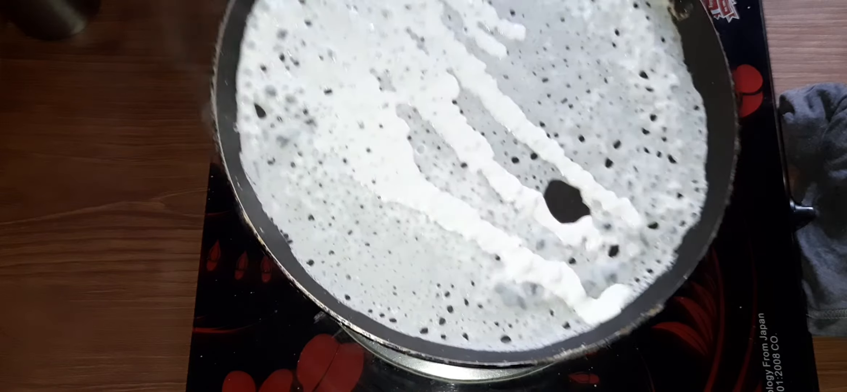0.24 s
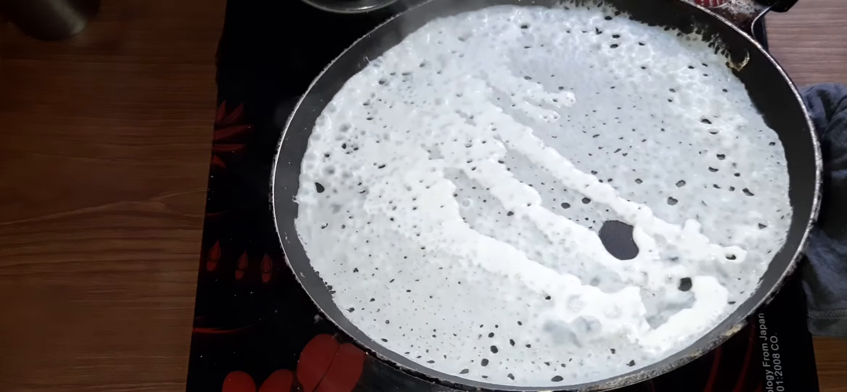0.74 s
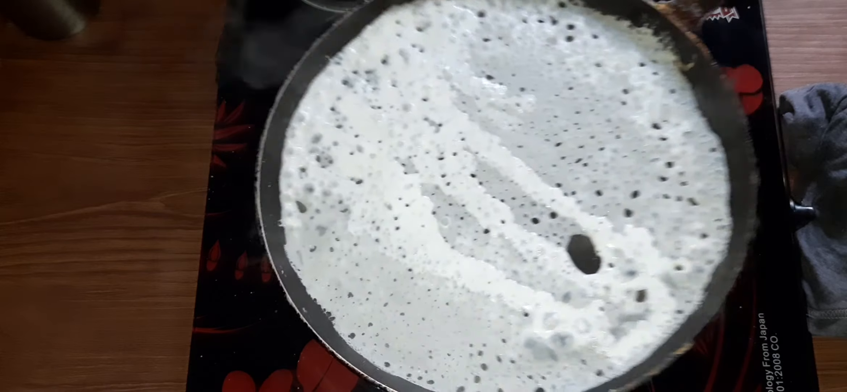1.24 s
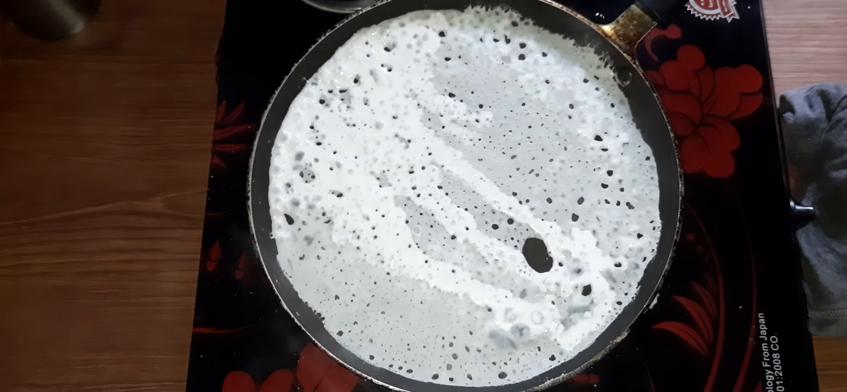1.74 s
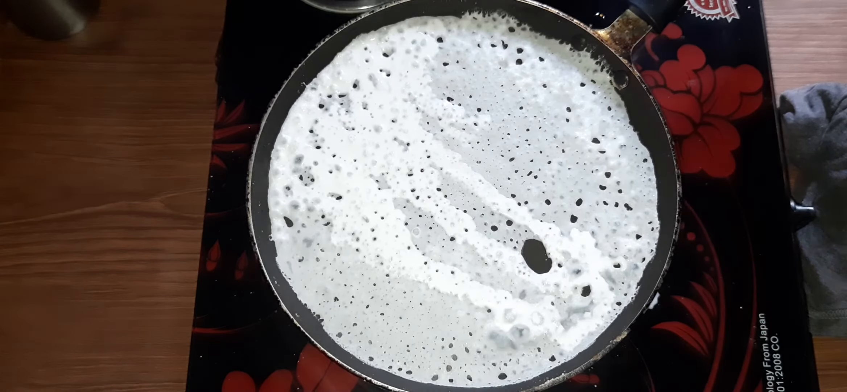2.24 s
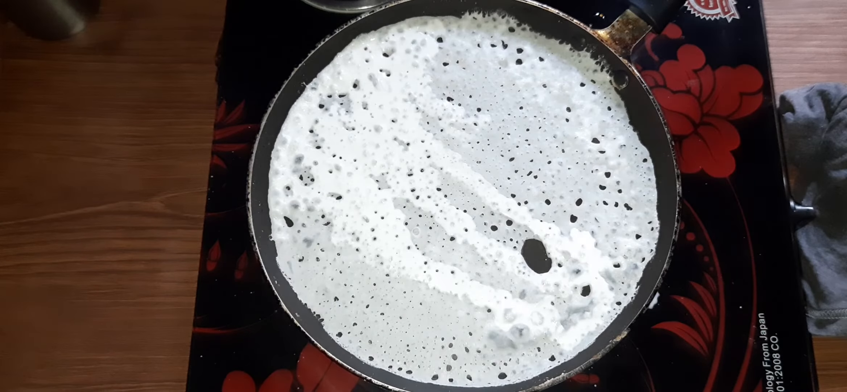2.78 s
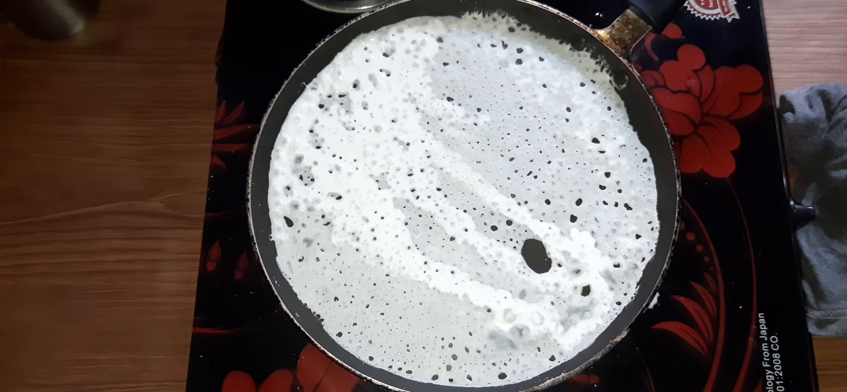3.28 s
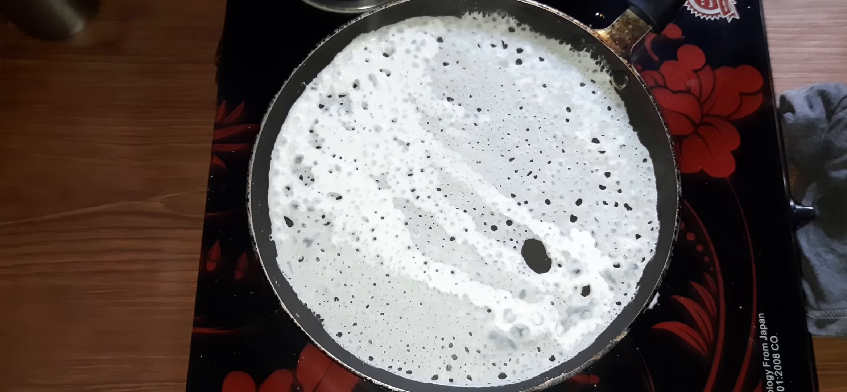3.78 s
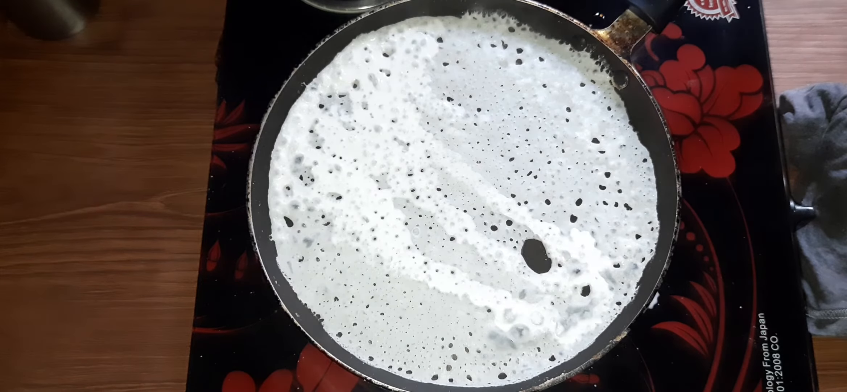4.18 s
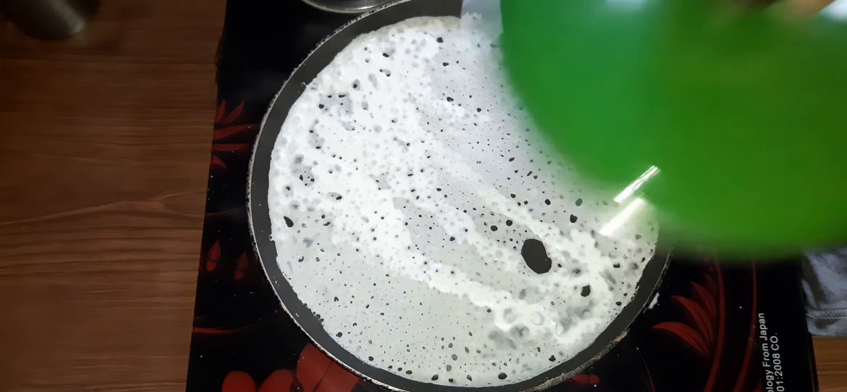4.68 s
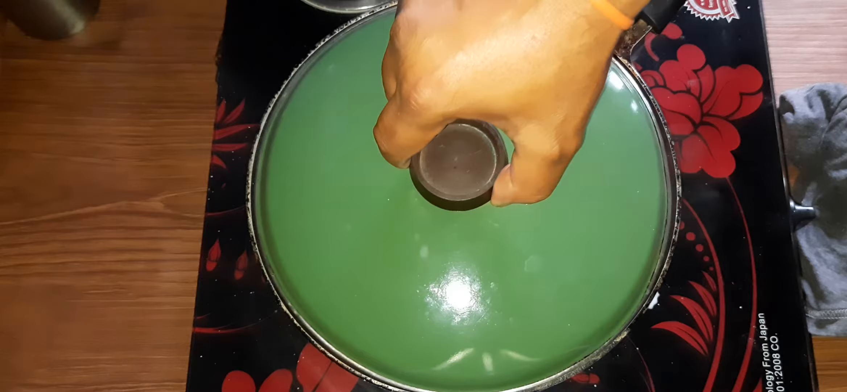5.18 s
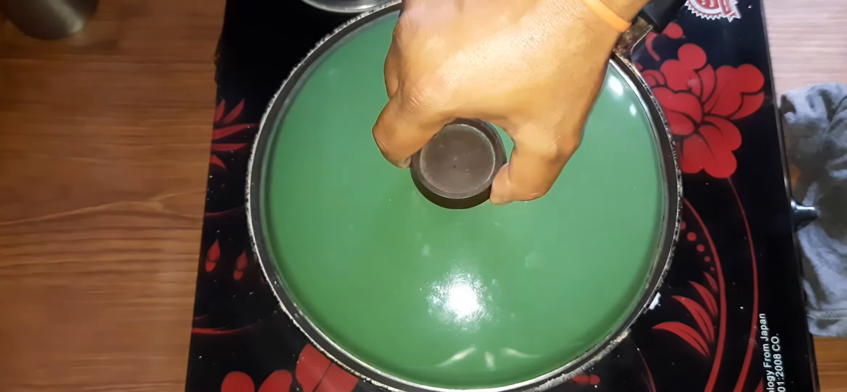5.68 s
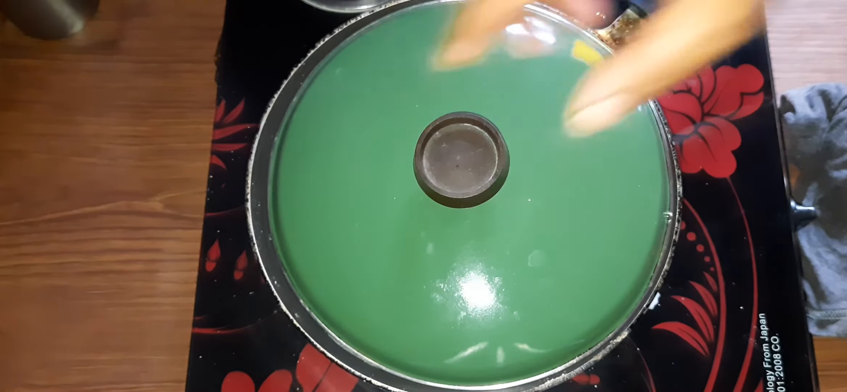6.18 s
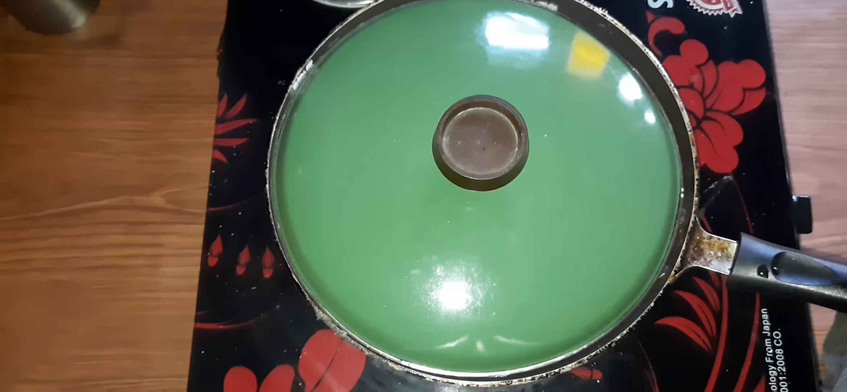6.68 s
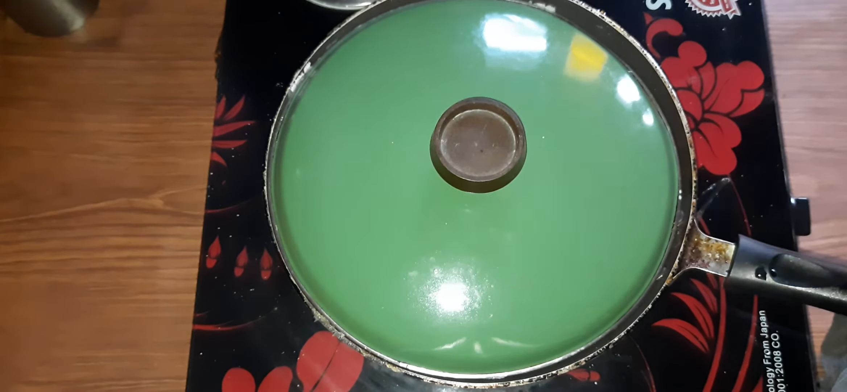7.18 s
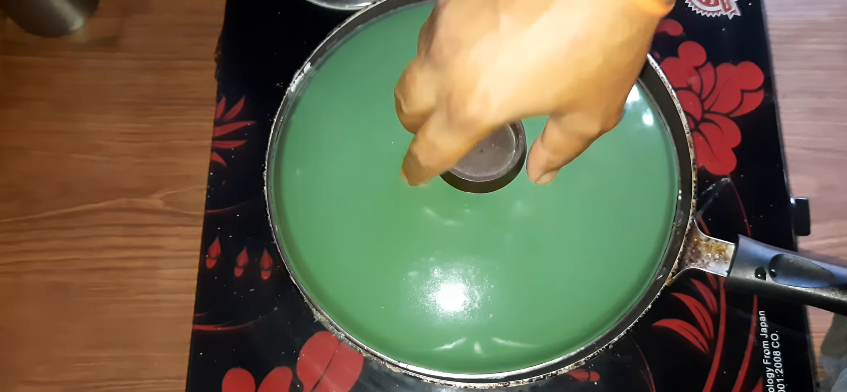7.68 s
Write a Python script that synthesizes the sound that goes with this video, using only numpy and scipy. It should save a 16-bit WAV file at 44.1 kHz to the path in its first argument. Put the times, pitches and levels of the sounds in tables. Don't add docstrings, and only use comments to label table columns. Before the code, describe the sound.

In a small, slightly live kitchen, close stereo pickup opens on loud, wet sizzling batter, with dense crackle, sharp spits and a low fluttering flame. From about 0.7 s small bubbles pop with rising blips as the frying subsides. At 1.55-1.75 s the pan is set down in a cluster of dull metallic clunks with a low boom; knocks and a bright grate ring follow around 1.9-2.15 s. Sparse spits and pops continue over thin fizz. A soft door thud booms at 3.45 s. Around 4.55 s something brushes lightly; the sizzle dulls as a lid lowers, with a faint airy steam whistle from 5.1 s and tiny low touches near 5.4 s. At 5.9 s a round hollow thump leads into bright, fierce fat crackling with strong spits. At 6.75 s it drops to a quiet, muffled simmer, faint rustles, occasional snaps and low steam drumming, swelling near 7.6 s until the end.

```python
import sys
import numpy as np
from scipy import signal
from scipy.fft import rfft
from scipy.io import wavfile
from scipy.ndimage import uniform_filter1d

SR = 44100
rng = np.random.default_rng(int(sys.argv[2]) if len(sys.argv) > 2 else 0)


def transcribe(signal):
    frames = np.atleast_2d(signal).T
    limited = np.clip(frames, -1, 1)
    pcm = np.round(limited * 32767).astype(np.int16)
    wavfile.write(sys.argv[1], SR, pcm)


def gain_from_db(level_db):
    decades = np.asarray(level_db, float) / 20
    return 10 ** decades


N = 349713

FAT_S, LID_ON_S = 5.885, 6.758
LID_LOWERED_S = (4.73, 5.22)
FADE_S, FADE_FROM_DB = 0.065, -22
SEATED_S, UPPER_DB = 1.5, (-3.5, 4)
STILL_DB, STILL_LID_DB = -73.5, -11
SPIT_WET_DB = 5.5
VENT_HZ, VENT_WIDTH = 5900, 940
DRUM_HZ, DRUM_WIDTH = 227.8, 42
EDGE_HZ = 15950

# t/s, level/dB, wetness of the batter (0-1)
FRY = [(0.0, -43.5, 0.95), (0.404, -42.5, 1.02), (1.068, -46.5, 1.0), (1.328, -50.5, 1), (1.535, -54.5, 1),
       (2.4, -59.5, 0.97), (3.0, -58.5, 0.6), (3.134, -62, 0.53), (3.43, -58, 0.17), (3.95, -59.5, 0.27),
       (4.35, -57, 0.2), (4.54, -60, 0.02), (5.069, -58, 0.05), (5.88, -63.5, 0.12), (6.104, -58, 0.08),
       (6.576, -59, 0.12), (6.992, -60.5, 0.13), (7.93, -61, 0.01)]
# low f/Hz, high f/Hz
FRY_BANDS = [
    (9000, 15500),
    (3500, 7000),
    (1000, 2500),
    (180, 700),
]
# f/Hz, density/dB
OPEN_PAN = [(88, -43.5), (150, -14), (201, -23.5), (407, -17.5), (652, -11.5), (1000, -10), (1570, -5.5),
            (2800, -3), (7550, -1.5), (9730, -7.5), (11800, -4), (15300, -3.5), (16200, -13.5)]
# f/Hz, density/dB
HOT_FAT = [(88, -52), (150, -5), (392, -17), (467, -15), (892, -8.5), (1270, -17), (5740, 11.5),
           (10100, -6), (12600, -7), (15300, -6), (16200, -18)]
# f/Hz, width/Hz, level/dB
UNDER_LID = [
    (216, 180, 20),
    (1266, 225, 19),
    (1734, 610, 8.5),
]
# f/Hz, likeness
LIKENESS = [(60, 0.94), (180, 0.081), (550, 0.4), (1650, 0.44), (4970, -0.45), (15000, -0.05)]
# f/Hz, L-R/dB
LEAN = [(60, 1.5), (180, -5.5), (550, -2), (1650, -1), (4970, -2), (15000, 4.5)]
# fizz/dB, hiss/dB, bubbling/dB, simmer/dB
STAGES = [
    (-0.83, -6, -22, -24.5),
    (19.5, 8.5, 1.5, -13.5),
    (-3, -11, -6, -10),
]
# fizz/dB, hiss/dB, bubbling/dB, simmer/dB
WET_DB = (0.1, 2.7, 18.85, 1.5)
# fizz/dB, hiss/dB, bubbling/dB, simmer/dB
LID_DB = (-6.5, -14, -5, 8.5)

# t/s, level/dB
BURNER = [(0.0, -55), (0.126, -67.5), (0.49, -53.5), (1.46, -58), (1.6, -66.5), (2.354, -89.5),
          (3.4, -80.5), (3.8, -65), (4.43, -81.5), (5.5, -69), (5.72, -81), (6.1, -71), (6.4, -74),
          (6.6, -99), (7.93, -83)]
# f/Hz, width/Hz, share of fuzz
FLAME = [
    (69, 4, .3),
    (118, 5, .4),
]
# f/Hz, density/dB
STILL_AIR = [(12, -45.5), (20, -9), (46, -5), (123, -0.5), (179, -8), (285, -10.5), (400, -17), (520, -49),
             (880, -120)]

# t/s, peak level/dB, body level/dB
SPITS = [(0.0373, -37, -11), (0.095, -25, -4), (0.3033, -21, -9), (0.3707, -26, -2), (0.3974, -26, 2),
         (0.491, -34, -4), (0.5004, -41, -4), (0.7679, -24.5, -4), (0.8499, -25, -4), (0.8584, -24, -4),
         (0.9157, -24, 1), (0.941, -24.5, -4), (1.0035, -27, 6), (1.012, -24.5, 1), (1.1716, -16.5, -2.5),
         (1.1996, -24.5, -8), (1.235, -23, -2), (1.2525, -25, -4), (1.3142, -25, 3), (1.3308, -36, -10),
         (1.3522, -37, -9), (1.369, -30, -8), (1.4335, -31.5, -4), (1.453, -42, -4), (1.4677, -29, -2),
         (1.523, -26, 6), (1.5961, -23, -2.5), (1.7493, -32, -4), (1.8115, -34, -4), (1.832, -38, -5.5),
         (1.844, -37, -6), (1.8773, -34, -4), (2.111, -32, -3), (2.1301, -39, -3.5), (2.3006, -38, -2),
         (2.3404, -32, -6), (2.358, -30, -6), (2.542, -41, -3.5), (2.5556, -24.5, -2.5), (2.562, -31, -2),
         (2.5684, -36.5, -2), (2.6549, -49, -6), (2.7407, -48, -4), (2.7487, -42, 2), (2.7981, -42, -4),
         (2.8403, -38.5, -4), (2.8475, -40, -2), (2.9068, -32.5, 5), (3.1428, -41.5, -3),
         (3.1997, -46, -4.5), (3.3288, -39.5, -3), (3.3404, -36, -6), (3.5469, -32.5, -4),
         (3.7205, -45, -4), (3.7759, -46, -4), (3.7983, -36.5, 2), (4.0213, -37, 4), (4.0348, -35.5, -2),
         (4.2563, -45, -5.5), (4.397, -44, -3.5),
         (4.5357, -44.5, -3), (4.5737, -39.5, -3.5), (4.7306, -44, 1), (5.7355, -56, -9),
             (6.0504, -27, -1), (6.1116, -35, .1), (6.1754, -19, 4.5), (6.2002, -18, -2),
             (6.2265, -17.5, 3), (6.2665, -21, 6), (6.382, -38, .1), (6.509, -15, 3), (6.5352, -22, .1),
             (6.555, -20.5, 5), (6.5898, -26, 1), (6.7247, -21, 3), (6.8374, -39.5, .1), (6.9022, -33, -6),
             (7.2137, -38, -9), (7.5418, -45, -2), (7.889, -33, -2)]
# body level/dB, top level/dB re peak, L-R/dB
SPIT_STAGES = [
    (-29, -14.5, 1.5),
    (-26, -11.5, 2.5),
    (-31, -14.5, -3),
]
# f/Hz, t60/s
KITCHEN = [(60, 0.6), (250, 0.59), (1000, 0.42), (4000, 0.39), (12000, 0.2)]
# t/s, peak level/dB, f/Hz
BUBBLES = [(0.741, -28, 2560), (1.083, -34, 1960), (1.2408, -31, 1610), (1.285, -25.5, 1520),
           (1.356, -32, 1460), (1.4037, -28, 1720), (2.2657, -36, 1890), (2.588, -37, 1800),
           (2.684, -53.5, 3120), (2.7219, -35.5, 1733), (2.75, -42, 1560), (2.771, -43, 1650),
           (2.837, -44, 1502), (3.0083, -34.5, 2650)]

# colour (f/Hz, density/dB), modes (f/Hz, level/dB, t60/s), level of modes/dB, left lag/samples
PAN = ([(120, -58.5), (200, -17), (366, -9), (735, -9), (806, -30), (1000, -17.5), (1370, -16), (1740, -19),
        (2420, -13), (3900, -25), (9750, -38.5), (12400, -35.5), (16000, -48)], [(117, -16.5, 0.082),
        (291, -12.5, 0.4), (330, -8, .25), (373, -2, 0.31), (402, -6, 0.23), (450, -9, 0.4),
        (473.5, -8, .2), (530, 1, .22), (576, -5.5, 0.3), (646.6, -9, 0.24), (704, -7, 0.25),
        (791, -2, 0.28), (810, -10, 0.17), (1135, -15.5, 0.16), (2280, -10.5, .15), (2445, -14, 0.14),
        (2640, -12, 0.2), (2860, -11, 0.18), (3280, -18, 0.13)], 0, -1.3)
GRATE = ([(590, -9), (1000, -11.5), (1260, -7), (1770, -10), (1980, -5), (3380, -8.5), (5500, -10),
          (5900, -16.5), (8450, -12.5), (16000, -23)], [(1990, 2.5, 0.3), (2540, -7, 0.32), (4350, -8, 0.4),
          (4858, -6, 0.11), (4950, -9, 0.11), (4930, -2, .1), (5370, 5.5, 0.13), (5514, 0, 0.1),
          (5582, -5, 0.1), (5480, 3, 0.11), (6330, -0.5, 0.17), (6498, -3, 0.18), (8360, 11, 0.05)], -9.5, 6)
TRIVET = ([(120, -41), (200, -8), (323, -11.5), (610, -0.5), (839, -12.5), (1800, -20), (2440, -12),
           (3870, -31.5), (9000, -36.5), (11700, -73), (19800, -120)], [(120.3, -17, 0.5),
           (286.8, -2.5, 0.62), (371, 4.5, 0.27), (449, -8, 0.69), (543, -16, 0.17), (639, 3.5, 0.3)],
           -6.5, 2)
DOOR = ([(24, -67), (45, -43), (119, -10), (190, -9), (258, -5.5), (535, -14), (683, -10.5), (891, -14.5),
         (1660, -12.5), (2530, -20.5), (6000, -34), (10400, -48), (17600, -120)], [(257, -8.5, 0.24),
         (358, -18, .2), (414.7, -8, 0.16), (699, -10, 0.18), (1058, -11.5, 0.35), (1088.5, -9, 0.36),
         (1320, -11.5, 0.3), (1694, -10.5, 0.22), (2054, -13, 0.16), (2340, -9.5, 0.15), (2842, -13, 0.36),
         (71, -18, .3)], -8.5, 10.8)
CLOTH = ([(150, -28.5), (500, -7), (1200, -18.5), (3000, -5.5), (5000, -6), (12000, -9)], [], 0, -2)
LID = ([(47, -51), (80, -50), (113, -10), (286, -17), (393, -0.5), (689, -6), (1560, -38.5), (2020, -35),
        (3000, -51), (3900, -105), (6600, -120)], [(413, 9, 0.11), (522, 9, 0.091), (620, -23, 0.055)],
        -14.5, -8.5)
RUSTLE = ([(59, -47), (110, -22), (166, -2.5), (466, -7.5), (586, -3), (1200, -21), (1560, -62),
           (2640, -120)], [], 0, 2)
DOME = ([(100, -58), (170, -16.5), (319, -26), (400, -6), (620, -14.5), (1930, -38), (2500, -32),
         (3250, -51), (5500, -120)], [(301, -14, 0.17), (398.5, -6.5, 0.3), (628, -17, 0.11)], 4.3, -6)
RIM = ([(1700, -48.5), (1970, 1.5), (2250, -44.5)], [(1968, 1, 0.3), (1985, -3, 0.28)], 8.8, 0)
# (t/s, level/dB, contact decay/s)
BLOWS = [
    (PAN, 0.15, 0.63, [(1.546, -29, 0.0081), (1.566, -22.5, 0.016), (1.612, -32, 0.014), (1.638, -33.5, 0.02), (1.711, -32, 0.0046), (1.74, -42.5, 0.017), (1.765, -41.5, 0.0054)]),
    (TRIVET, 0.16, .1, [(1.892, -31.5, 0.0073), (1.91, -41, 0.03)]),
    (GRATE, 0.066, 1.4, [(1.925, -31.5, 0.0036), (1.945, -37, 0.034), (2.022, -40.5, 0.0075), (2.094, -42, 0.022), (2.16, -50, .03)]),
    (DOOR, 0.15, -0.33, [(3.446, -47.5, 0.043), (3.465, -33, 0.07)]),
    (CLOTH, 0.42, 0.67, [(4.565, -48.5, 0.052), (4.625, -50.5, 0.012)]),
    (LID, 0.083, .1, [(5.385, -50.5, 0.005), (5.428, -47, 0.0018), (5.445, -54, 0.01)]),
    (RUSTLE, 0.086, -2.5, [(5.256, -76, 0.057), (6.835, -61, 0.024), (6.9, -62.5, 0.042), (7.21, -68, 0.013), (7.54, -71.5, 0.013)]),
    (DOME, 0.26, .6, [(5.878, -53, 0.028), (5.902, -50.5, 0.01)]),
    (RIM, .35, 5.7, [(5.89, -65, 0.033)]),
]
# top t/s, level/dB, f/Hz, rise/s, fall/s
SWELLS = [
    (1.64, -46, 117, .05, 0.068),
    (2.001, -47.5, 117, 0.045, 0.049),
    (3.53, -37, 117, 0.036, 0.053),
    (3.779, -51.5, 117, .07, 0.07),
    (3.87, -63.5, 293, 0.088, 0.088),
    (4.2, -75.5, 290, 0.09, 0.076),
    (5.27, -67, 1968, .006, .13),
    (4.04, -64, 117, .04, 0.054),
    (5.918, -31.5, 400, 0.016, 0.017),
]
# t/s, level/dB
VENT = [
    (4.7, -93),
    (5.098, -74),
    (5.5, -80.5),
    (5.88, -78),
    (5.9, -99),
]
# t/s, level/dB
DRUM = [
    (6.76, -99),
    (6.9, -64),
    (7.45, -74.5),
    (7.62, -56),
    (7.93, -64.5),
]


def evened(x):
    return x / np.sqrt(np.mean(x ** 2) + 1e-20)


def read(points, hz):
    f, value = np.transpose(points)
    return np.interp(np.log(hz + 1), np.log(f + 1), value)


def add(mix, s, sound):
    part = mix[..., round(s * SR):][..., :sound.shape[-1]]
    part += sound[..., :part.shape[-1]]


def sides(pan_db):
    return gain_from_db(np.array([[0.5], [-0.5]]) * pan_db)


def coloured(x, spectrum):
    hz = abs(np.fft.fftfreq(8192, 1 / SR))
    log_gain = np.log(gain_from_db(np.maximum(read(spectrum, hz), -90)))
    phase = -signal.hilbert(log_gain).imag
    taps = np.fft.ifft(np.exp(log_gain + 1j * phase)).real[:4096]
    taps = taps.reshape((1,) * (x.ndim - 1) + (-1,))
    return signal.oaconvolve(x, taps)[..., :x.shape[-1]]


def ringing(x, hz, width):
    return signal.lfilter(*signal.iirpeak(hz, hz / width, SR), x)


def stage(t):
    return np.searchsorted([FAT_S, LID_ON_S], t)


def crackle(per_s, spread_db, burst_s, spots=6):
    size = gain_from_db(spread_db * np.minimum(rng.exponential(1, N), 4.5))
    size *= rng.random(N) < per_s / SR
    size *= rng.choice([-1, 1], N)
    spot = rng.integers(0, spots, N)
    out = np.zeros((2, N))
    for k in range(spots):
        burst = rng.standard_normal(600) * np.exp(-np.arange(600) / SR / burst_s)
        pops = signal.oaconvolve(size * (spot == k), burst / np.linalg.norm(burst))[:N]
        out += [pops, np.roll(pops, 3 * k - 11)]
    return evened(out)


def frying(crackle_db=-6, sputter_db=-13.0, patchy_db=0.99, flicker_db=1.09):
    a, b = rng.standard_normal((2, N))
    hz, t, (a, b) = signal.stft(np.array([a, b]), SR, nperseg=512, noverlap=384)
    now = stage(t)
    same = np.clip(read(LIKENESS, hz), 0, 1)[:, None]
    steam = np.array([a, same * a + np.sqrt(1 - same ** 2) * b])
    patches = uniform_filter1d(rng.standard_normal(a.T.shape).T, 8, 0)
    patches = evened(uniform_filter1d(patches, 20, 1))
    flicker = evened(uniform_filter1d(rng.standard_normal(len(t)), 5))
    gurgle = (1 + 1.4 / (1 + (hz / 350) ** 2))[:, None]
    z = steam * gain_from_db(patchy_db * gurgle * patches + flicker_db * flicker)

    grains = gain_from_db(crackle_db) * crackle(per_s=1400, spread_db=4.5, burst_s=0.000077)
    sputter = crackle(per_s=42, spread_db=1.5, burst_s=0.00075)
    sputter = gain_from_db(sputter_db) * np.diff(sputter, prepend=0)
    fierce = gain_from_db(2.0 * ((t > FAT_S) & (t < LID_ON_S)))
    z += signal.stft(grains + sputter, SR, nperseg=512, noverlap=384)[2] * fierce

    hollow = 0.05
    for f, width, db in UNDER_LID:
        hollow = hollow + gain_from_db(db) ** 2 / (1 + (2 * (hz - f) / width) ** 2) ** 1.2
    lid_db = np.where(hz < 2500, 10 * np.log10(hollow), read(OPEN_PAN, hz))
    shape = np.array([read(OPEN_PAN, hz), read(HOT_FAT, hz), lid_db]).T[:, now]

    s, vigour_db, wet = np.transpose(FRY)
    shaded = np.interp(t, LID_LOWERED_S, [0, 1]) * (now == 0)
    levels = np.interp(t, s, vigour_db) + np.transpose(STAGES)[:, now]
    levels = levels + np.outer(WET_DB, np.interp(t, s, wet)) + np.outer(LID_DB, shaded)
    swell = np.clip((t - FAT_S) / FADE_S + gain_from_db(FADE_FROM_DB), 1e-3, 1)
    levels = levels + 20 * np.log10(swell) * (now == 1)
    lift = []
    for (lo, hi), db in zip(FRY_BANDS, levels):
        power = (gain_from_db(shape[(hz > lo) & (hz < hi)]) ** 2).sum(0)
        lift.append(db - 10 * np.log10(power / len(hz)))
    centres = np.log([np.sqrt(lo * hi) for lo, hi in FRY_BANDS])[::-1]
    weights = np.array([np.interp(np.log(hz + 1), centres, one) for one in np.eye(4)[::-1]])
    lean = np.multiply.outer([0.5, -0.5], read(LEAN, hz))[..., None]
    z *= gain_from_db(shape + weights.T @ lift + lean)
    return signal.istft(z, SR, nperseg=512, noverlap=384)[1][:, :N]


def burner():
    t, out = np.arange(N) / SR, 0
    low_db = np.interp(t, *np.transpose(BURNER))
    levels = low_db, low_db + np.where(t < SEATED_S, *UPPER_DB)
    for (hz, width, fuzz), db in zip(FLAME, levels):
        air = ringing(rng.standard_normal(N), hz, 2 * width)
        air = evened(ringing(air, hz, 4 * width))
        waver = uniform_filter1d(rng.standard_normal(N), 5000)
        waver = evened(uniform_filter1d(waver, 5000))
        tone = np.sqrt(2) * np.sin(2 * np.pi * np.cumsum(hz + 0.4 * width * waver) / SR)
        out = out + gain_from_db(db) * evened(tone + fuzz * air)
    near, apart = rng.standard_normal(N), rng.standard_normal((2, N))
    still = evened(coloured(near + 1.6 * apart, STILL_AIR))
    return out + gain_from_db(STILL_DB + STILL_LID_DB * (t > LID_ON_S)) * still


def spits(snap_s=0.00057, trail_db=-11, trail_s=0.0055, lift_db=2.5):
    out, t = np.zeros((2, N)), np.arange(900) / SR
    drops = SPITS
    noise = rng.standard_normal((len(drops), 3, len(t)))
    fry_s, _, wet = np.transpose(FRY)
    for (s, db, own_db), (a, b, c) in zip(drops, noise):
        front = 3.5 * (t == 0) + a * np.exp(-t / snap_s)
        trail = gain_from_db(trail_db) * np.array([b, c]) * np.exp(-t / trail_s)
        burst = np.array([front, np.roll(front, 3)]) + trail
        body_db, top_db, pan_db = SPIT_STAGES[stage(s)]
        body_db = body_db + own_db + SPIT_WET_DB * np.interp(s, fry_s, wet)
        colour = [(500, body_db - 9.5), (1500, body_db + 17.0), (3000, body_db + 18.0),
                  (5500, 0.013), (9000, 0.0048), (11500, top_db + 13.5), (16000, top_db + 16.5)]
        pop = coloured(burst, colour)
        add(out, s, gain_from_db(db + lift_db) * sides(pan_db) * pop / abs(pop.mean(0)).max())
    return out


def kitchen(x):
    at = np.arange(120, SR - 20, 20) + rng.integers(0, 20, (2, (SR - 121) // 20))
    taps = np.zeros((2, SR))
    np.put_along_axis(taps, at, rng.choice([-1., 1.], at.shape), 1)
    hz, t, z = signal.stft(taps, SR, nperseg=256)
    same = (1 / (1 + (hz / 500) ** 2))[:, None]
    z[1] = same * z[0] + np.sqrt(1 - same ** 2) * z[1]
    decay = gain_from_db(-60 * t / read(KITCHEN, hz)[:, None])
    tail = signal.istft(z * decay, SR, nperseg=256)[1]
    return signal.fftconvolve(x, tail[None] / np.linalg.norm(tail[0]), axes=2)[..., :N]


def bubbles(cycles=1.2, rise=0.11):
    out, t = np.zeros((2, N)), np.arange(500) / SR
    for s, db, hz in BUBBLES:
        turns = hz * t
        swell = turns / (1 + turns) * np.exp(-turns / cycles)
        blip = np.sin(2 * np.pi * turns * (1 + rise * turns / 10)) * swell
        add(out, s, 2 * gain_from_db(db) * blip)
    return out


def blow(body, db, rise_s, contact_s, pan_db, apart=0.94):
    colour, modes, modes_db, lag = body
    t = np.arange(SR) / SR
    a, b = rng.standard_normal((2, SR)) * (1 - np.exp(-t / rise_s)) * np.exp(-t / contact_s)
    left = np.roll(a, round(max(lag, 0)))
    right = np.roll(a, round(max(-lag, 0))) + apart * (b - uniform_filter1d(b, size=40))
    contact = np.array([left, right])
    sound = evened(coloured(contact, colour))
    if modes:
        held = abs(rfft(contact))
        rings = 0
        for hz, mode_db, t60 in modes:
            share = np.hypot(held[:, [round(hz)]], 0.43 * np.linalg.norm(a))
            ring = gain_from_db(mode_db - 60 * t / t60) * np.sin(2 * np.pi * hz * t)
            rings = rings + ring * np.minimum(hz * t, 1) / share
        sound += gain_from_db(modes_db) * evened(signal.fftconvolve(contact, rings, axes=1)[:, :SR])
    return gain_from_db(db - 16) * sides(pan_db) * sound


def knocking():
    out = np.zeros((2, N))
    for body, rise, pan_db, rows in BLOWS:
        for s, db, contact_s in rows:
            add(out, s, blow(body, db, rise * contact_s, contact_s, pan_db))
    return out


def boom():
    out = 0
    for s, db, hz, rise_s, fall_s in SWELLS:
        t = np.arange(N) / SR - s
        swell = np.exp(-0.5 * (t / np.where(t < 0, rise_s, fall_s)) ** 2)
        out = out + gain_from_db(db) * swell * np.sin(2 * np.pi * hz * t)
    return out


def whistle(hz, width, level, apart):
    air = rng.standard_normal(N) + apart * rng.standard_normal((2, N))
    tone = evened(ringing(ringing(air, hz, width), hz, width))
    return gain_from_db(np.interp(np.arange(N) / SR, *np.transpose(level))) * tone


def vent():
    edge = whistle(VENT_HZ, VENT_WIDTH, VENT, apart=2.2)
    return edge + whistle(DRUM_HZ, DRUM_WIDTH, DRUM, apart=0.53)


def scene():
    knocks = knocking()
    pops = spits() + bubbles()
    late = np.arange(N) / SR > LID_ON_S
    source = knocks + gain_from_db(-10) * pops
    early_echo, late_echo = kitchen(np.array([source * ~late, source * late]))
    echoes = early_echo * ~late + late_echo
    return gain_from_db(2.5) * knocks + echoes + pops + frying() + burner() + vent() + boom()


def low_pass(x):
    return signal.sosfilt(signal.butter(12, 16960, fs=SR, output="sos"), x)


def record(dry):
    dry = signal.sosfilt(signal.butter(2, 45, "high", fs=SR, output="sos"), dry)
    edge = signal.firwin(511, EDGE_HZ, window=("kaiser", 5), fs=SR)[None]
    mix = signal.oaconvolve(dry, edge, "same")
    return low_pass(mix)


dry = scene()
out = record(dry)
transcribe(out)
```